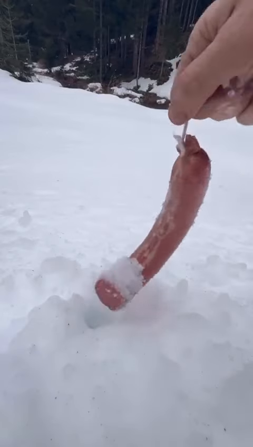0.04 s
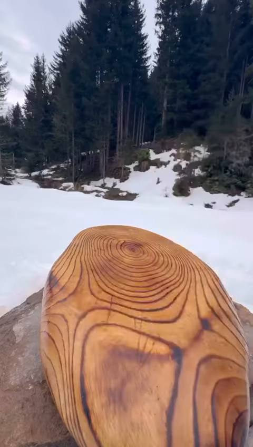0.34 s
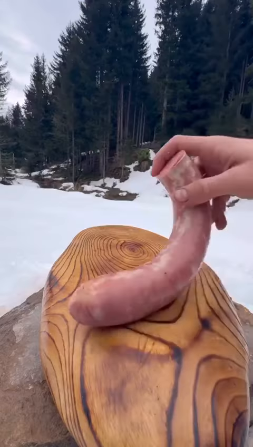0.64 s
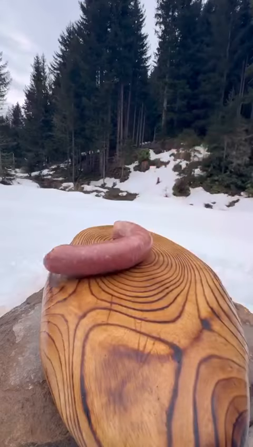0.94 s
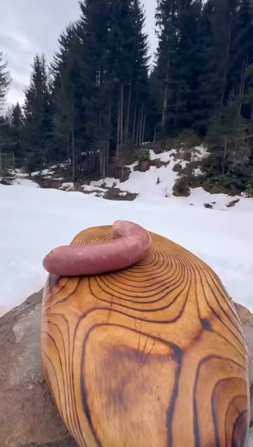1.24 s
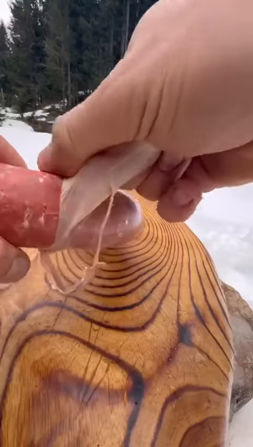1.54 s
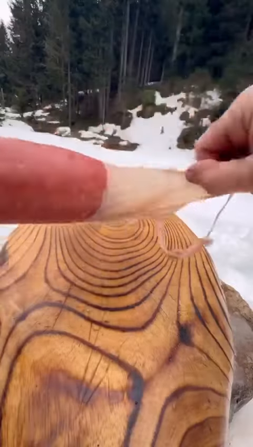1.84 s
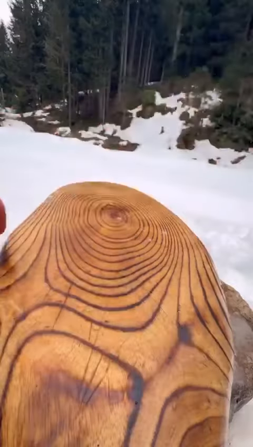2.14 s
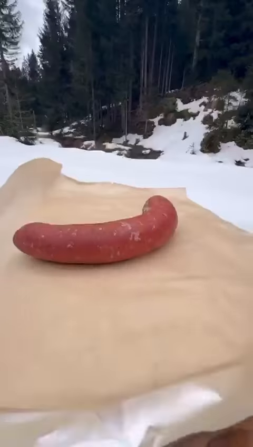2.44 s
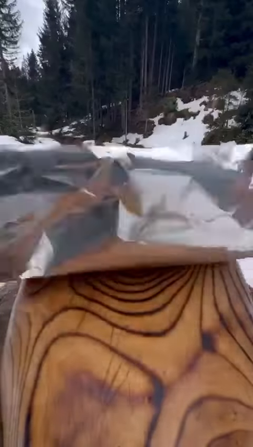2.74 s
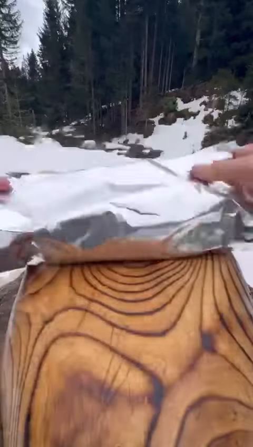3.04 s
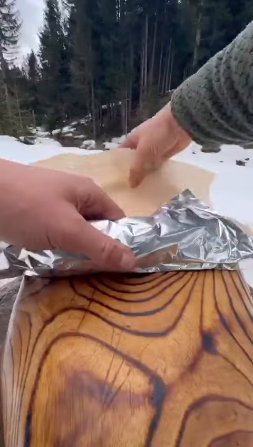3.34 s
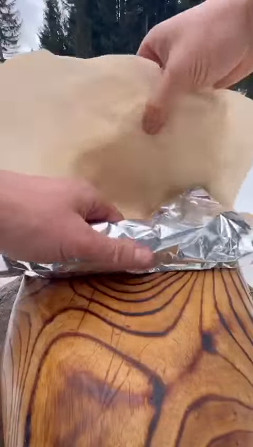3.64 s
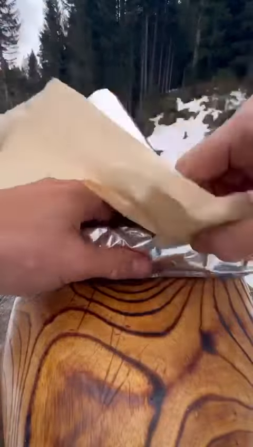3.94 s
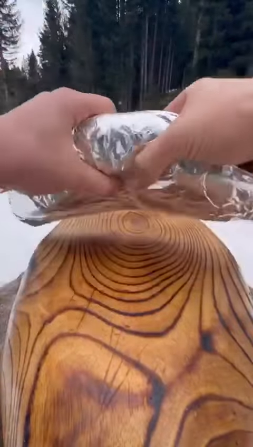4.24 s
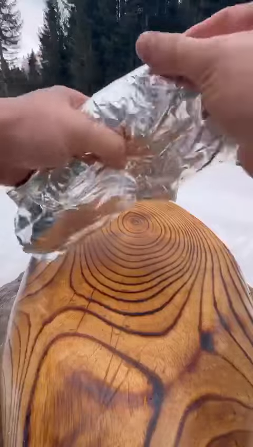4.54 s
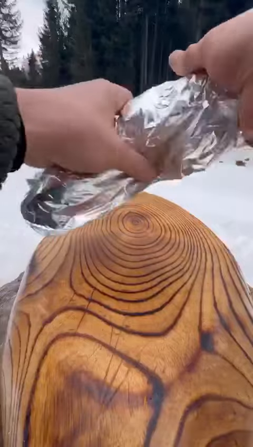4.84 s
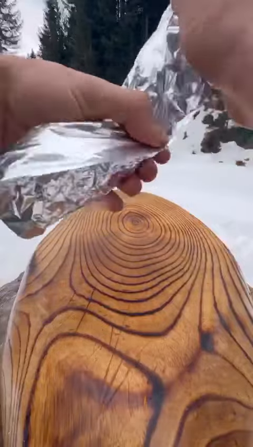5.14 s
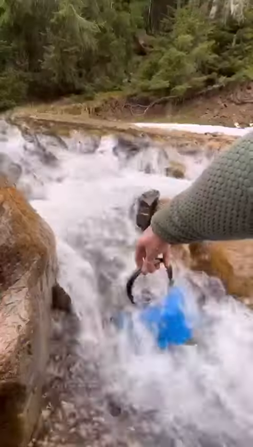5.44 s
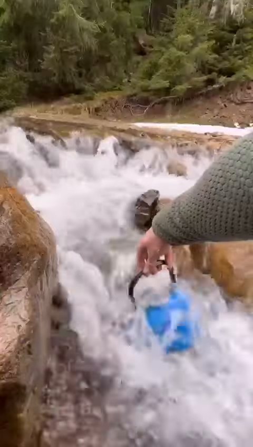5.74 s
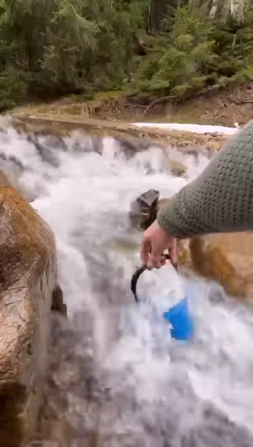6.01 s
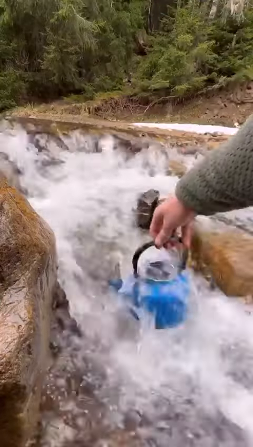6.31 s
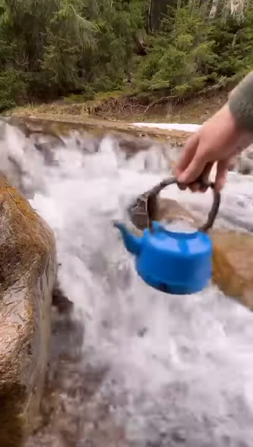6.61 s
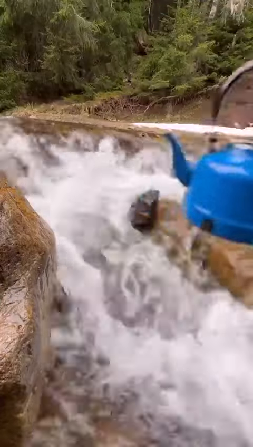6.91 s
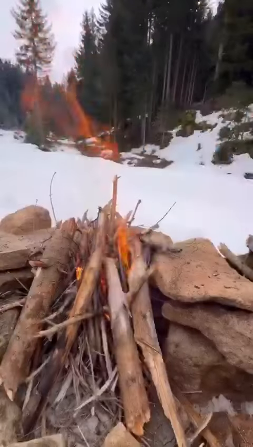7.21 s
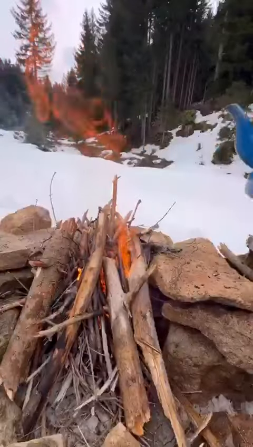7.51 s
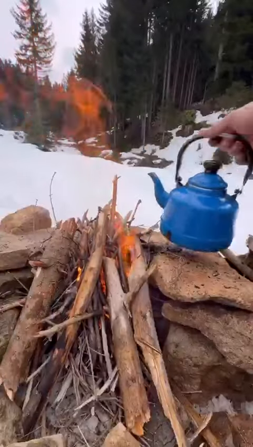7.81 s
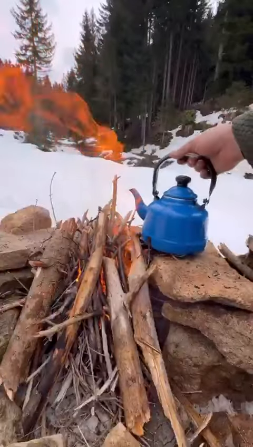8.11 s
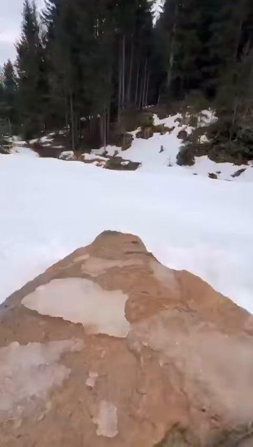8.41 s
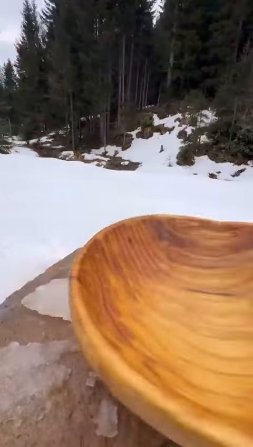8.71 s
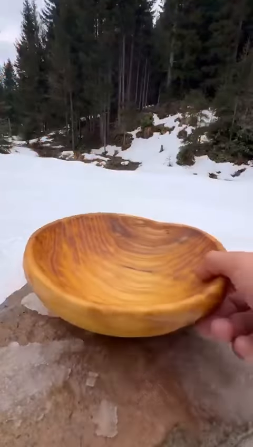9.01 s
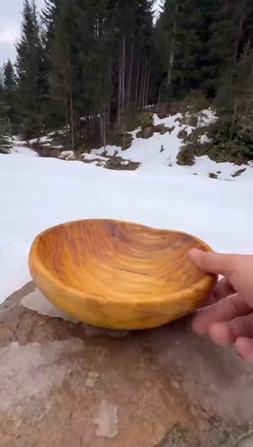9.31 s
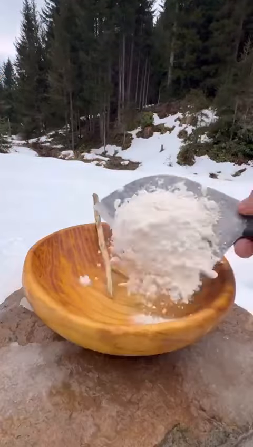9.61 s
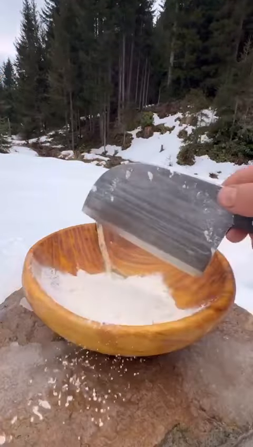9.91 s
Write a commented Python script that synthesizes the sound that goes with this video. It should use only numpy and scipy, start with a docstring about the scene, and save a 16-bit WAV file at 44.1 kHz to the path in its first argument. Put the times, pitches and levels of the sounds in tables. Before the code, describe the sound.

Outdoors, a sausage flops on wood, foil crinkles loudly, a stream rushes, a wood fire pops, a kettle clinks and a wooden bowl knocks.

```python
"""Cooking outdoors in the snow

A sausage flops on a wooden slab, is skinned, and is wrapped in foil whose creases snap loudly.
A kettle is dipped in a rushing stream, then set down beside a fire of popping wood.
A wooden bowl knocks and scrapes on rock. Wind rumbles on the microphone over a faint, far hiss."""
import sys
import numpy as np
from scipy import signal
from scipy.io import wavfile
from scipy.ndimage import uniform_filter1d, map_coordinates

SR = 44100
rng = np.random.default_rng(int(sys.argv[2]) if len(sys.argv) > 2 else 0)


def transcribe(signal):
    """Save signal, clipped to [-1, 1], as a 16-bit WAV file at the path in sys.argv[1]."""
    frames = np.atleast_2d(signal).T
    limited = np.clip(frames, -1, 1)
    pcm = np.round(limited * 32767).astype(np.int16)
    wavfile.write(sys.argv[1], SR, pcm)


N = 439236
T = np.arange(N) / SR

FOIL_RUSTLE_SPANS = [(2.283, 1.809, -30), (4.11, 1.305, -34)]  # light foil rustle, broken by one brief gap: t/s, length/s, level/dB
FOIL_SQUEEZES = [(2.29, 0.12, -31), (2.41, 0.13, -22), (2.578, 0.021, -18), (2.64, 0.34, -22.5),
                 (3.13, 0.029, -23), (3.385, 0.19, -25), (3.66, .1, -25.5), (3.77, 0.057, -19.5),
                 (3.85, .11, -22), (4.0, 0.1, -22), (4.115, 0.085, -24.5), (4.195, 0.084, -19.5),
                 (4.322, 0.066, -22.5), (4.4, .15, -25.5), (4.655, 0.11, -28), (4.78, 0.08, -18.5),
                 (4.91, 0.14, -29), (5.105, 0.034, -24.5), (5.268, 0.06, -24.5)]  # fingers press the foil: t/s, length/s, end level/dB
# foil pitch ranges against the fine creases: t/s, top boost/dB, large faces/dB, whole sheet/dB
FOIL_BALANCE = [(2.3, 7.5, -12, -24), (2.55, 4, -14, -23), (2.635, 3, -5, -13), (2.95, 2.5, -6, -12),
                (3.299, -4, -4.5, -6), (4.3, -1, -3, -6.5), (4.45, -1, -8.5, -11.5), (4.85, -3, -6.5, -8),
                (5.05, 3.5, -10, -14.5)]
FOIL_TONE = [(60, -4.5), (130, 4), (400, 0), (6200, 0), (7700, -1), (9600, 2.5), (12000, -7)]  # tone of the foil: f/Hz, level/dB
FOIL_BUCKLES = [(2.2965, -16.5, 10000), (2.36, -22, 9000), (2.883, -11, 2022), (3.866, -14, 1800),
                (4.0623, -4, 3200), (4.072, -4.5, 2700), (4.2538, -8.5, 3960), (4.3061, -9, 2780),
                (4.3275, -8, 5000), (4.5438, -11.5, 3280), (4.6634, -11.5, 4400), (4.6896, -8, 9000),
                (4.809, -10.5, 860), (4.833, -8.5, 5820), (5.131, -15.5, 1800), (5.2695, -12.5, 8300)]  # big folds give way: t/s, peak level/dB, f/Hz

SAUSAGE_LANDINGS = [(.624, -34), (0.779, -30.5), (0.844, -35.5), (0.922, -31.5)]  # the sausage hits the slab: t/s, level/dB
SLAB_NOTES = [(570, -3.5, 0.11), (1300, -8, 0.07)]  # the slab's ring: f/Hz, level/dB, fade time/s
FINGER_RUB = [(1.335, -52), (1.68, -58)]  # fingers rub the sausage: t/s, level/dB
SKIN_PULLS = [(1.35, 0.494, -43), (1.8, .12, -32)]  # tugs on the skin: t/s, length/s, end level/dB
SKIN_TONE = [(150, 6.5), (3500, -9), (12000, -17)]  # tone of tearing skin and of the grazing kettle: f/Hz, level/dB
SKIN_SMACKS = [(.457, -33, 7000), (.777, -24, 3360), (.921, -26.5, 1400), (1.597, -14.5, 6750),
               (1.863, -16.5, 2140), (1.893, -19, 1500), (1.915, -19.5, 2420)]  # wet snaps of the skin: t/s, peak level/dB, f/Hz
HAND_SWISHES = [(1.13, 0.085, -51)]  # a swish of handling: t/s, length/s, level/dB

WATER_TONE = [(50, -26.5), (130, -3.5), (220, -0.5), (450, -7.5), (900, -7.5), (4700, -20.5), (9300, -22.5),
              (12000, -30.5)]  # tone of the stream: f/Hz, level/dB
HANDLE_CLACKS = [(6.161, -16)]  # the kettle's handle clacks: t/s, level/dB
HANDLE_NOTES = [(3200, 0, .07)]  # the handle's ring: f/Hz, level/dB, fade time/s
KETTLE_CLINKS = [(8.103, -31), (8.138, -25), (8.157, -30)]  # the kettle rattles on rock: t/s, level/dB
KETTLE_NOTES = [(1227, -14.5, 0.45), (1970, -18, 0.35), (2780, -16, 0.41), (5120, -9, 0.17),
                (5938, -3, 0.21), (6272, -10, .3), (7900, -7, .17), (10100, -5, 0.15)]  # the kettle's ring: f/Hz, level/dB, fade time/s

FLAME_FLUTTER = [(6.93, 1.455, -38)]  # low flutter of the fire: t/s, length/s, level/dB
# burning wood pops, then sharp taps as the kettle is set down: t/s, peak level/dB, f/Hz
POPS_AND_TAPS = [(7.0728, -9.5, 10000), (7.1509, -25, 1740), (7.2208, -21, 2540), (7.2516, -12, 2640),
                 (7.3997, -13, 3800), (7.504, -21.5, 9380), (7.653, -13, 10300), (7.7223, -14.5, 9280),
                 (7.7416, -12, 9900), (7.821, -19, 8660), (7.9772, -5.5, 10200), (8.0654, -12.5, 1170),
                 (8.0793, -15.5, 2650), (8.1012, -19, 5930), (8.1177, -7, 8800)]
POP_TONE = [(200, -1.5), (1500, 4.5), (6500, -2.5), (8500, 2.5)]  # tone of the pops, taps and skin smacks: f/Hz, level/dB
STEAM_WHISTLE = [(7.219, 402, -34), (7.25, 1150, -42)]  # steam escapes from a log: t/s, f/Hz, level/dB
SAP_SIZZLES = [(7.875, 0.082, -45.5)]  # sap sizzles before the loudest pop: t/s, length/s, level/dB

BOWL_KNOCKS = [(8.476, -19, 806), (8.487, -21, 700)]  # the bowl hits rock: t/s, peak level/dB, f/Hz
BOWL_TONE = [(900, 0.5), (1300, -30), (2300, -7), (3300, -31)]  # tone of the hollow bowl: f/Hz, level/dB
BOWL_SLIDE = [(9.065, -64), (9.091, -24), (9.098, -47), (9.165, -39), (9.22, -68)]  # the bowl slides over grit: t/s, level/dB
GRIT_TONE = [(1800, -11.5), (2750, -1), (5000, -16.5), (12000, -19.5)]  # tone of the scrape: f/Hz, level/dB
DULL_BLOWS = [(3.098, -19.5, 104), (3.735, -17.5, 167), (4.265, -18.5, 110), (4.331, -15, 470),
              (4.41, -18.5, 303), (4.459, -22.5, 148), (4.653, -13, 457), (5.039, -20.5, 280),
              (5.194, -26, 340), (6.19, -17, 306), (6.2, -13.5, 141), (7.154, -23, 183), (7.255, -22, 171),
              (7.405, -19.5, 144), (8.138, -16.5, 162), (8.478, -20.5, 223)]  # thuds of sausage, hands, kettle, logs and bowl: t/s, level/dB, f/Hz

MIC_BUMP = [(1.272, -39), (1.328, -27)]  # a bump on the microphone: t/s, level/dB
WIND_GUSTS = [(.5, 0.47, -40), (1.85, 0.13, -38), (2.5, 0.35, -40.5), (2.95, 0.16, -35), (3.55, 0.93, -42)]  # gusts and handling on the microphone: t/s, length/s, end level/dB
HISS_STEPS = [(0, -53), (2.25, -50), (8.4, -55.5)]  # the far hiss steps to a new loudness: t/s, level/dB
HISS_TONE = [(30, -9), (150, 4), (2400, -1), (3400, -7.5), (6600, -7), (12000, -20)]  # tone of the far hiss: f/Hz, level/dB

# Sounds are built as two rows: mid (what both ears share) and side (how left and right differ).
NEAR_WIDTH = [(300, -13.5), (750, -3.5), (1500, -33.5), (2800, -11), (7600, 1), (8200, -19)]  # stereo width of close sounds: f/Hz, side against mid/dB
FAR_WIDTH = [(200, -18.5), (700, 3.5), (1700, -15), (2500, -2.5), (7600, -3.5), (9300, -8.5)]  # stereo width of sounds all around: f/Hz, side against mid/dB
A_LITTLE_LEFT = np.array([[1], [.2]])  # mid gain, side gain


def foil():
    """Thousands of creases snap each second; as the parcel tightens they get fewer and clearer."""
    loose = steady(crackle(per_s=6000, spread_db=-1.5, clump_db=0.8, fade_s=0.006))
    tight = steady(crackle(per_s=2000, spread_db=1.5, clump_db=1.08, fade_s=0.014))
    crisp = .52 * steady(crackle(per_s=200, spread_db=3, clump_db=0, fade_s=.004))
    tightness = np.clip(T - 3.6, 0, 1)
    blend = np.sqrt(1 - tightness) * loose + np.sqrt(tightness) * (tight + crisp)
    creases = colour(blend, FOIL_TONE)
    s, top_db, faces_db, sheet_db = np.transpose(FOIL_BALANCE)
    top = signal.sosfiltfilt(signal.butter(3, 8500, "high", fs=SR, output="sos"), creases)
    creases = creases + top * (amp(np.interp(T, s, top_db)) - 1)
    fine = steady(shimmer(band(creases, 2800, SR / 2, order=4)))
    flexing = colour(tight + crisp, FOIL_TONE)
    faces = steady(band(flexing, 1480, 2910, order=2)) * amp(np.interp(T, s, faces_db))
    sheet = steady(band(flexing, 78, 1310)) * amp(np.interp(T, s, sheet_db))
    return (fine + faces + sheet) * foil_loudness() + snaps(FOIL_BUCKLES, FOIL_TONE, fade_s=0.016)


def foil_loudness():
    """Squeezes swell over a light rustle; both drop out for one brief gap."""
    edge_s = 0.0088
    sounding = strokes([(start, length, 0) for start, length, _ in FOIL_RUSTLE_SPANS], edge_s, edge_s)
    squeezes = strokes(FOIL_SQUEEZES, rise_s=0.013, fall_s=0.023, build_db=2)
    return np.hypot(strokes(FOIL_RUSTLE_SPANS, edge_s, edge_s), sounding * squeezes)


def sausage():
    """It bounces on the ringing slab; fingers rub it and the skin tears off in sticky little slips."""
    slab = struck(SAUSAGE_LANDINGS, SLAB_NOTES, detune=0.012)
    flops = thuds([(s, db + 2, 63) for s, db in SAUSAGE_LANDINGS], sag=2.33, sag_s=0.012)
    rub = steady(band(noise(), 390, 523)) * level(*np.transpose(FINGER_RUB)) * A_LITTLE_LEFT
    pulls = strokes(SKIN_PULLS, rise_s=0.027, fall_s=0.011, build_db=11.5)
    tearing = steady(colour(crackle(), SKIN_TONE)) * pulls
    smacks = snaps(SKIN_SMACKS, POP_TONE, fade_s=0.016, ring=6.2)
    swish = fizz(HAND_SWISHES, lo_hz=3200, hi_hz=10000, rise_s=0.016)
    return slab + flops + rub + tearing + smacks + swish


def stream():
    """Churning water and spray gurgle for a moment; the handle of the dipped kettle clacks once."""
    water = shimmer(noise() + 0.6 * unit_level(crackle()), depth_db=4, width_hz=70)
    rush = unit_level(colour(water, WATER_TONE, FAR_WIDTH)) * level(s=(5.423, 6.932), db=(-30.5, -30.5))
    return rush + struck(HANDLE_CLACKS, HANDLE_NOTES, detune=.13)


def fireside():
    """Flames flutter, wood pops, steam whistles and sap sizzles; the kettle taps as it is set down."""
    flames = strokes(FLAME_FLUTTER, rise_s=0.015, fall_s=0.0052)
    flutter = rumble(top_hz=143, lumps_db=3.5, side=0.17) * flames
    s, hz, db = np.transpose(STEAM_WHISTLE)
    turns = np.cumsum(np.interp(T, s, hz)) / SR
    whistle = level(s, db) * np.sin(2 * np.pi * turns) * A_LITTLE_LEFT
    pops_and_taps = snaps(POPS_AND_TAPS, POP_TONE, fade_s=0.02, ring=1.4, echo_db=-24.5)
    return flutter + pops_and_taps + whistle + fizz(SAP_SIZZLES, lo_hz=5000, hi_hz=11300, rise_s=0.043)


def kettle():
    """The metal kettle grazes the rock and rings."""
    clank = struck(KETTLE_CLINKS, KETTLE_NOTES, detune=.011, count=5)
    graze = snaps([(s, db, 6000) for s, db in KETTLE_CLINKS], SKIN_TONE, fade_s=0.13)
    return clank + graze


def bowl():
    """The wooden bowl gives a hollow double knock, then slides briefly over grit."""
    scrape = steady(colour(crackle(), GRIT_TONE)) * level(*np.transpose(BOWL_SLIDE))
    return snaps(BOWL_KNOCKS, BOWL_TONE, fade_s=0.01) + scrape


def thuds(rows, sag=1.0, sag_s=0.0019, cycles=9, rise_s=0.00026, crunch=0.31):
    """Soft, slightly crunchy blows that die fast; their pitch sinks as the contact spreads."""
    out, t = np.zeros((2, N)), np.arange(SR // 4) / SR
    for s, db, hz in rows:
        turns = np.cumsum(hz * (1 + sag * np.exp(-t / sag_s))) / SR
        grain = unit_level(band(rng.standard_normal((1, len(t))), hz / 2, hz * 2, order=2))
        body = np.sin(2 * np.pi * turns) + crunch * grain
        loudness = amp(db - 60 * t * hz / cycles) * (1 - np.exp(-t / rise_s))
        add(out, s, loudness * body * A_LITTLE_LEFT)
    return out


def bump(hz=64.6):
    """Handling the microphone makes a low note that swells and stops short."""
    return level(*np.transpose(MIC_BUMP)) * np.sin(2 * np.pi * hz * T) * A_LITTLE_LEFT


def wind():
    """Gusts and a light breeze rumble on the microphone."""
    gusts = strokes(WIND_GUSTS, rise_s=0.068, fall_s=0.051, build_db=5)
    breeze = level(s=(.35, 5.05), db=(-52, -52))
    return rumble(top_hz=99, lumps_db=5.0, side=0.7) * np.hypot(gusts, breeze)


def far_hiss():
    """A faint outdoor hiss whose loudness changes in steps."""
    starts, db = np.transpose(HISS_STEPS)
    return unit_level(colour(noise(), HISS_TONE, FAR_WIDTH)) * amp(db[np.searchsorted(starts[1:], T)])


def crackle(per_s=3000, spread_db=2, clump_db=1, fade_s=0.0024, pitches=7):
    """Tiny snaps come in clumps; each is a burst of noise, strongest in one pitch range."""
    clumps = amp(clump_db * (wander(170) + wander(45)))
    fires = rng.random(N) < per_s / SR
    clicks = fires * amp(spread_db * np.minimum(rng.exponential(1, N), 4)) * clumps
    pitch_group, burst = rng.integers(0, pitches, N), noise()
    power_kept = amp(-60 / (fade_s * SR)) ** 2  # from one sample to the next

    def fading(hits):
        """Gives each click a dying tail."""
        return np.sqrt(signal.lfilter([1], [1, -power_kept], hits ** 2 + 1e-12))

    rings = sum(fading(clicks * (pitch_group == k)) * band(burst, hz / 1.66, hz * 1.6, order=1)
                for k, hz in enumerate(np.geomspace(500, 11000, pitches)))
    return fading(clicks) * burst + rings / np.sqrt(pitches)


def snaps(rows, tone, fade_s, ring=2.1, echo_db=-15.5, rise_s=.0004, size=4096):
    """Short cracks, each strongest near its own pitch, with a faint echo from things nearby."""
    out, t = np.zeros((2, N)), np.arange(size) / SR
    loudness = (amp(-60 * t / fade_s) + amp(echo_db - 60 * t / 0.075)) * (1 - np.exp(-t / rise_s))
    for s, db, hz in rows:
        burst = rng.standard_normal((2, size)) * loudness
        crack = colour(burst + ring * band(burst, hz / 2, hz * 2, order=1), tone)
        add(out, s - rise_s, amp(db) * crack / abs(crack[0]).max())
    return out


def struck(rows, notes, detune, count=12):
    """Blows make an object ring; its uneven shape splits each note into several close ones."""
    out, t = np.zeros((2, N)), np.arange(SR // 2) / SR
    for s, db in rows:
        ring = np.zeros(len(t))
        for hz, note_db, fade_s in list(notes) * count:
            split_hz = hz * (1 + detune * rng.uniform(-0.98, 1))
            ring += amp(note_db - 60 * t / fade_s) * np.sin(2 * np.pi * split_hz * t)
        add(out, s, amp(db) * ring / count * A_LITTLE_LEFT)
    return out


def fizz(rows, lo_hz, hi_hz, rise_s):
    """Short, finely grained hisses."""
    return steady(band(crackle(), lo_hz, hi_hz)) * strokes(rows, rise_s, fall_s=0.011) * A_LITTLE_LEFT


def rumble(top_hz, lumps_db, side):
    """Swirling air makes a low, lumpy noise."""
    lumpy = noise() * amp(lumps_db * wander(20))
    return unit_level(band(lumpy, 42.3, top_hz, order=2)) * np.array([[1], [side]])


def shimmer(x, depth_db=4.3, width_hz=120, hold_s=.035, size=1024):
    """Narrow pitch ranges swell and fade at random, as the source changes shape."""
    overlap = size * 3 // 4
    spectra = signal.stft(x, nperseg=size, noverlap=overlap)[2]
    bins, frames = spectra.shape[1:]
    hz, s = np.arange(bins) * SR / size, np.arange(frames) * size / 4 / SR
    grid = np.meshgrid(hz / width_hz, s / hold_s, indexing="ij")
    patches = map_coordinates(rng.standard_normal((400, 400)), grid, order=1, mode="wrap")
    return signal.istft(spectra * amp(depth_db * patches), nperseg=size, noverlap=overlap)[1][:, :N]


def strokes(rows, rise_s, fall_s, build_db=0):
    """Loudness of a series of movements: each starts, can build up to its end, then dies away."""
    power = np.zeros(N)
    for start, length, db in rows:
        done = np.clip((T - start) / length, 0, 1)
        rise = np.clip((T - start) / rise_s, 0, 1)
        fall = np.exp(-np.clip((T - start - length) / fall_s, 0, 20))
        power += (amp(db + build_db * (done - 1)) * rise * fall) ** 2
    return np.sqrt(power)


def colour(x, tone, width=NEAR_WIDTH, size=2048):
    """Gives a sound its tone and stereo width."""
    hz = abs(np.fft.fftfreq(size, 1 / SR))
    mid_db = db_at(tone, hz)
    log_gain = np.log(amp(np.maximum([mid_db, mid_db + db_at(width, hz)], -100)))
    response = np.exp(np.conj(signal.hilbert(log_gain)))  # rings after a click, never before it
    taps = np.fft.ifft(response).real[:, :size // 2]
    return signal.oaconvolve(x, taps, axes=1)[:, :x.shape[1]]


def db_at(points, hz):
    """Reads a tone or width table between its rows."""
    f, db = np.transpose(points)
    return np.interp(np.log(hz + 1), np.log(f + 1), db)


def band(x, lo_hz, hi_hz, order=3):
    """Keeps the pitches between two limits."""
    sos = signal.butter(order, [lo_hz, min(hi_hz, SR / 2 - 1)], "band", fs=SR, output="sos")
    return signal.sosfilt(sos, x)


def steady(x):
    """Evens out slow swells to a level of 1 but keeps the fine grain."""
    return x / np.sqrt(abs(uniform_filter1d(x[0] ** 2, size=3000)) + 1e-12)


def unit_level(x):
    """Scales a sound so that its mid has an average (rms) level of 1."""
    return x / np.sqrt(np.mean(x[0] ** 2) + 1e-20)


def wander(per_s):
    """A slow random curve, about 1 in size."""
    points = rng.standard_normal(8000)
    return np.interp(T * per_s, np.arange(len(points)), points)


def noise():
    """Separate noise for mid and side."""
    return rng.standard_normal((2, N))


def level(s, db):
    """Loudness along a decibel curve, silent outside it."""
    return amp(np.interp(T, s, db, left=-150, right=-150))


def amp(db):
    """Turns decibels into a multiplier."""
    return 10 ** (np.asarray(db) / 20)


def add(mix, s, sound):
    """Mixes a sound in at time s."""
    part = mix[:, max(round(s * SR), 0):][:, :sound.shape[-1]]
    part += sound[..., :part.shape[1]]


def scene():
    """Adds all sources and turns mid and side into left and right."""
    background = far_hiss() + wind() + bump()
    cooking = sausage() + foil() + stream() + fireside() + kettle() + bowl() + thuds(DULL_BLOWS)
    mid, side = background + cooking
    return np.array([mid + side, mid - side])


def record(dry):
    """Rounds off the loudest peaks, then removes the highest treble."""
    ceiling, top_hz = .8, 11920
    rounded = dry / (1 + (dry / ceiling) ** 4) ** (1 / 4)
    taps = signal.firwin(301, top_hz, window=("kaiser", 9), fs=SR)
    return signal.oaconvolve(rounded, taps[None], "same", axes=1)


dry = scene()
out = record(dry)
transcribe(out)
```